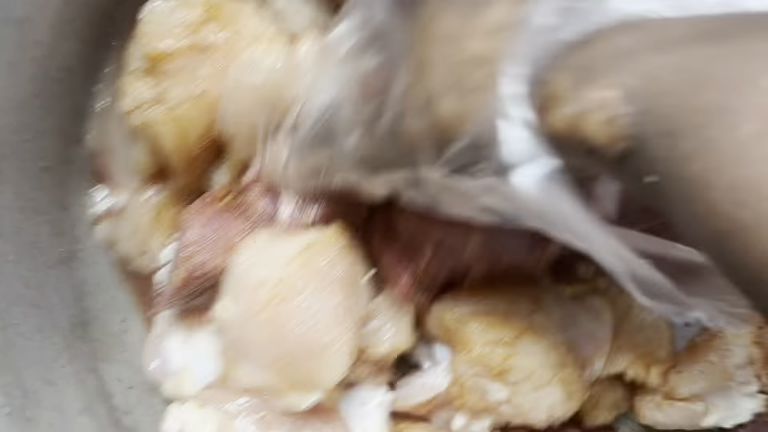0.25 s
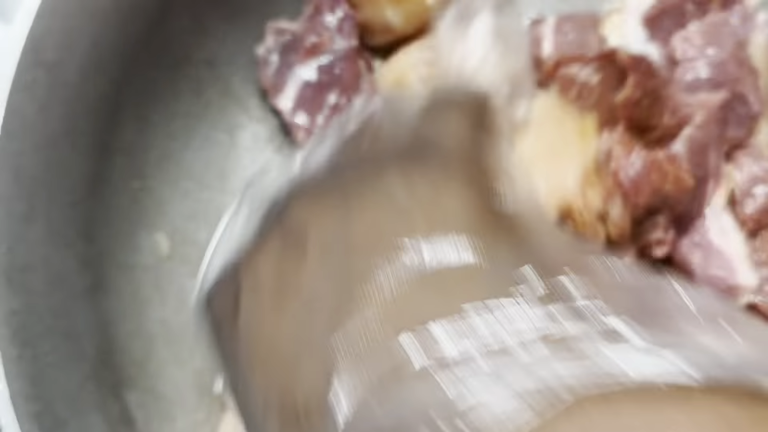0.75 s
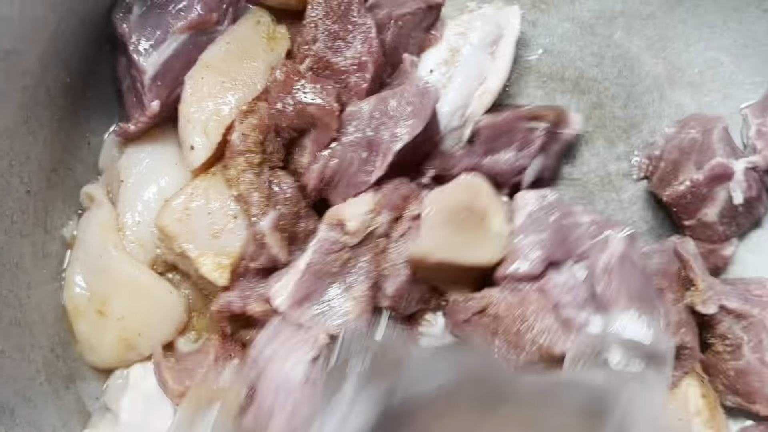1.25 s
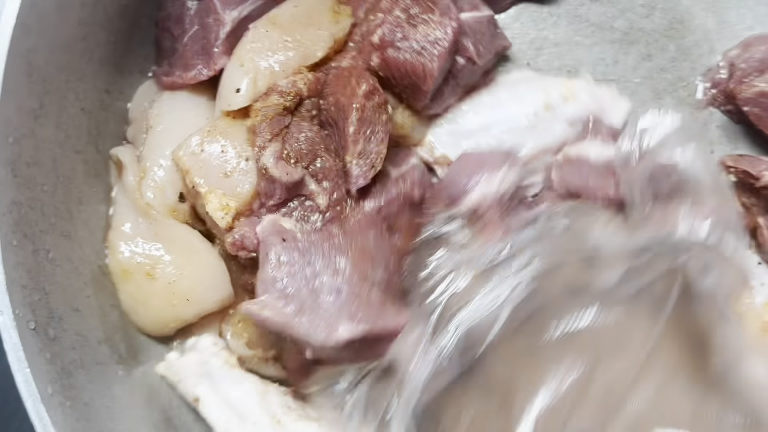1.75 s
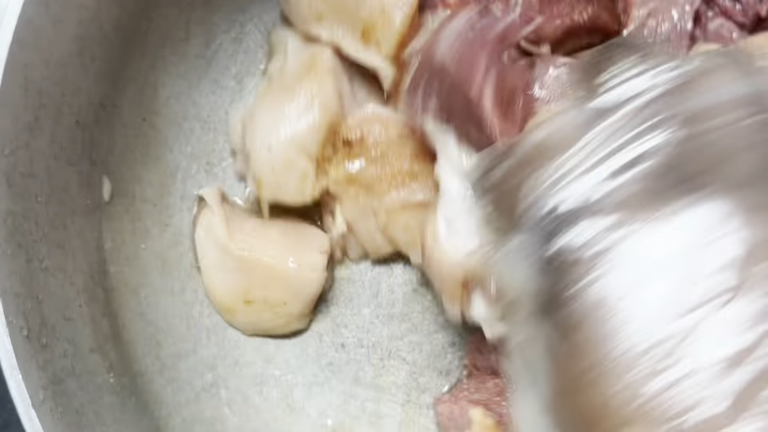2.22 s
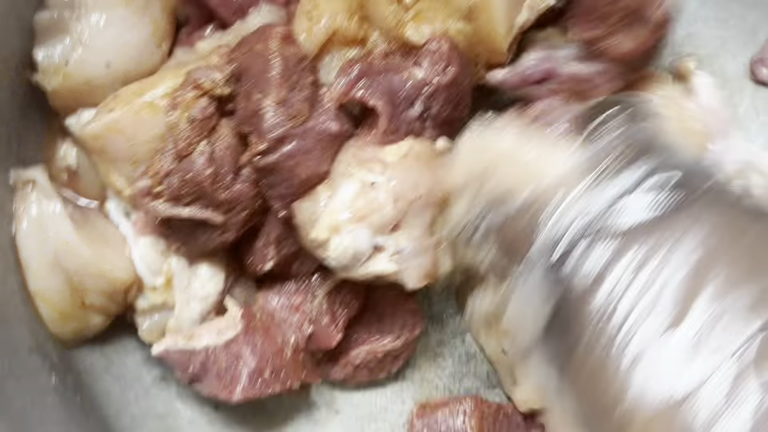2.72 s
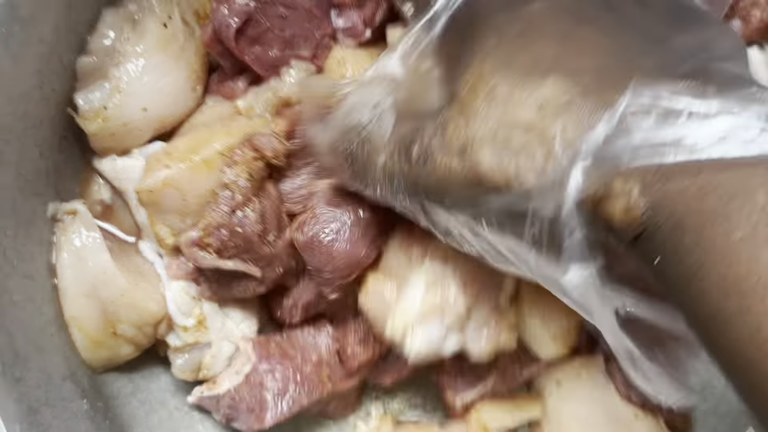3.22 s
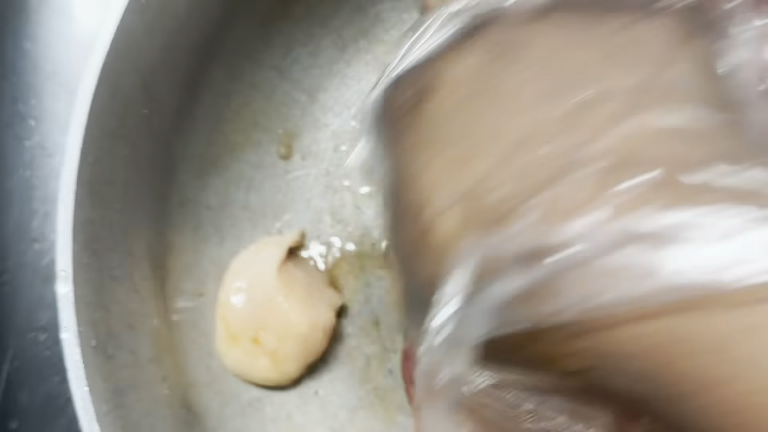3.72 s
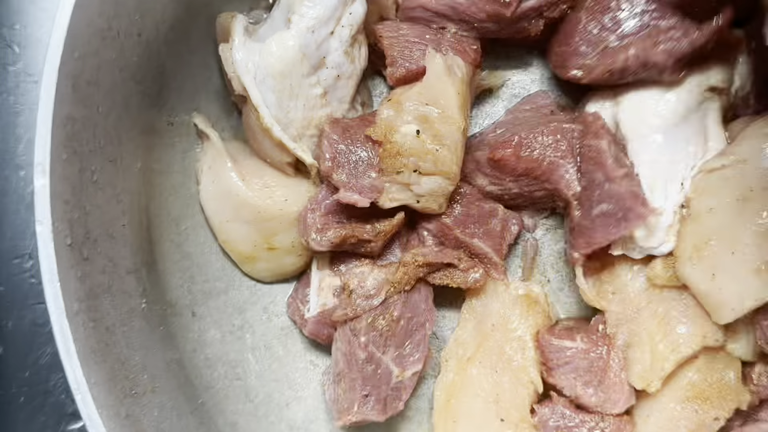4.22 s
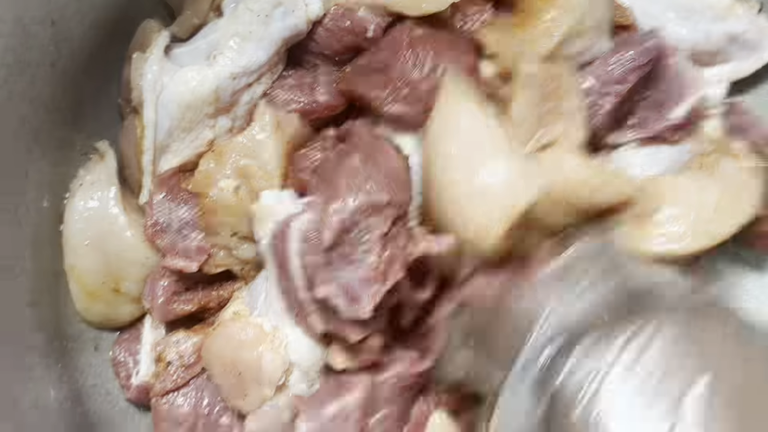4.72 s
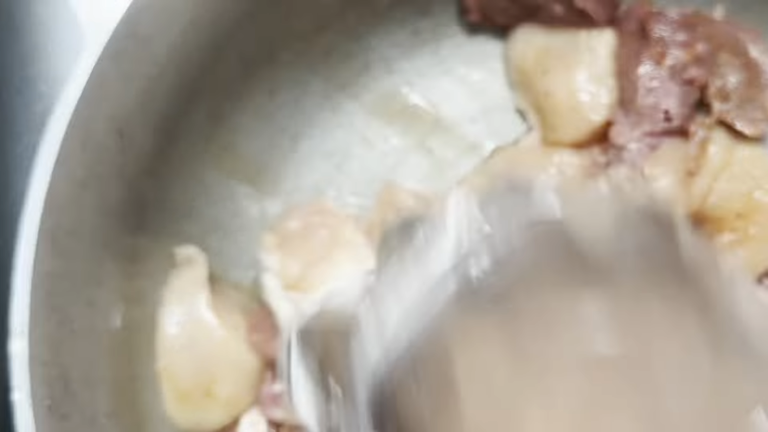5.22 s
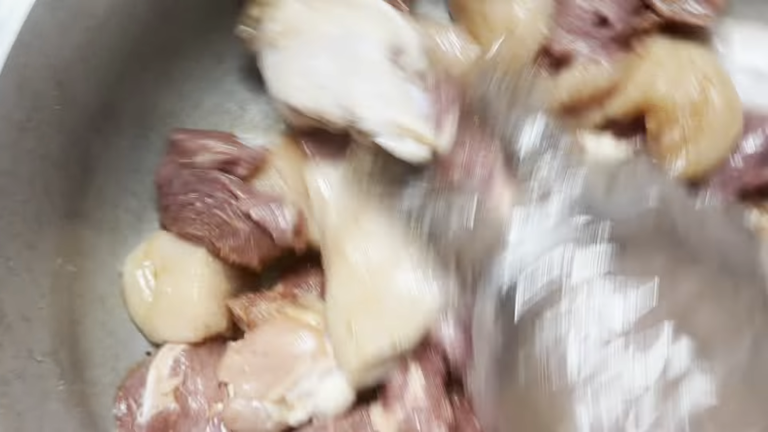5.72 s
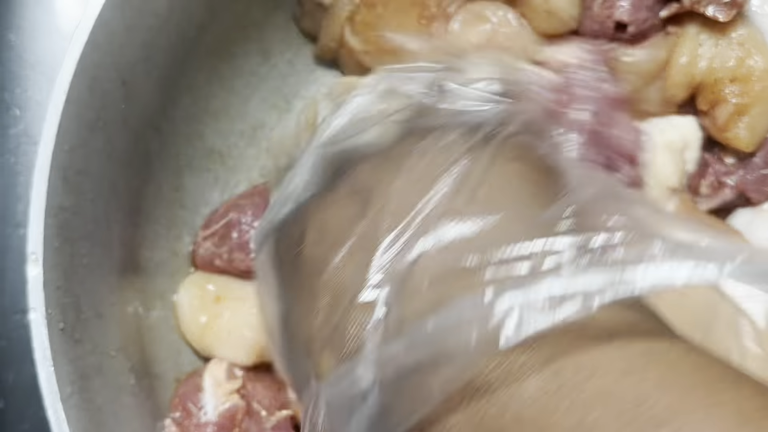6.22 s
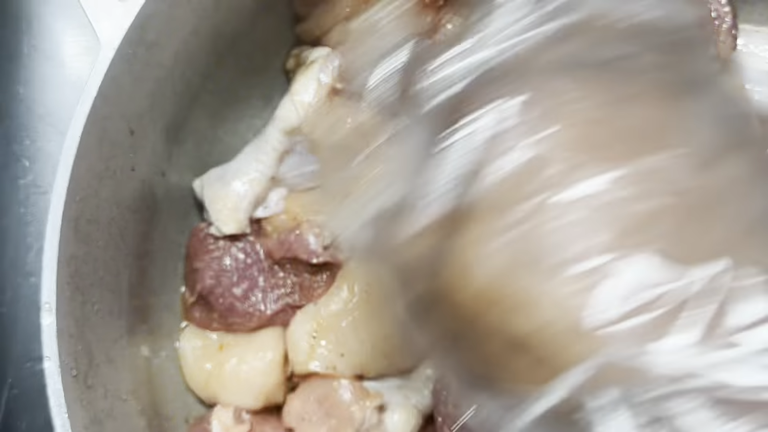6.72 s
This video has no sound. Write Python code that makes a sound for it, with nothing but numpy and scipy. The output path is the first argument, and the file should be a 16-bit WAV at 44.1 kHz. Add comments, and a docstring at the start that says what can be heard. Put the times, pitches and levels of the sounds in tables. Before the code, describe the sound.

Close, wide stereo sound of raw seasoned meat being turned by hand in an aluminium pot. A thin plastic glove crinkles in quick repeated strokes while wet pieces squelch and drag over the metal. Limp pieces land with dull, wet thuds, the harder ones making the pot ring briefly. A loud drop comes near the start, more follow irregularly, and the end grows softer over a quiet kitchen tone.

```python
"""In a kitchen, close by, a gloved hand turns raw, seasoned meat over in a wide aluminium pot.
The thin plastic glove crinkles, rustles and ticks: random clicks and noise through filters.
Wet pieces squelch (torn films, air pops) and drag over the metal (slips stirring damped pot modes).
Tossed pieces slap down: a push and a wet splat make the bottom thud; bare metal rings briefly.
Judders of the glove, squirts of juice and a quiet room tone complete it."""
import sys
import numpy as np
from scipy import signal
from scipy.fft import rfft, irfft, next_fast_len
from scipy.io import wavfile

SR = 44100
rng = np.random.default_rng(int(sys.argv[2]) if len(sys.argv) > 2 else 0)


def wav_record(signal):
    """Record a signal, one row per channel, as 16-bit PCM in the file named by sys.argv[1]."""
    frames = np.transpose(np.atleast_2d(signal))
    bounded = np.clip(frames, -1, 1)
    # unit amplitude maps onto the largest positive 16-bit level
    quanta = np.round(bounded * 32767).astype(np.int16)
    wavfile.write(sys.argv[1], SR, quanta)


N = 306495
TIME = np.arange(N) / SR

# Table levels are relative: scene() trims each layer.
# damped modes of the pot: freq_hz, level_db, t60_share (of the ring time)
BOTTOM_MODES = [(130, 2, 0.85), (154, 10.5, 1), (229, -33, 0.42), (280, -7.5, 1), (384, 0, 1)]
WALL_MODES = [(477, -1, 0.44), (543, 2.5, 0.33), (609, 1, 0.87), (650.5, 1.5, 0.76), (855, -15.5, 1)]
RIM_MODES = [(908, -0.5, 0.94), (1122, 2.5, 0.74), (1332, 2.5, 0.66), (1640, -32, 0.25), (1982, 2.5, 0.78),
             (2190, 2, 0.49), (2393, -3.5, .8)]


def from_db(db):
    """Decibels to gain."""
    return 10 ** (np.asarray(db) / 20)


def rms_one(x):
    """Scale to rms 1."""
    return x / np.sqrt(np.mean(x ** 2) + 1e-20)


def add(out, start_s, x):
    """Mix a sound in at a time."""
    start = int(start_s * SR)
    out[start:start + len(x)] += x


def in_time(rows):
    """Each column of a curve, at every sample."""
    time_s, *columns = np.transpose(rows)
    return [np.interp(TIME, time_s, column) for column in columns]


def at_hz(points, hz):
    """Read a table on a log-frequency axis."""
    points = np.array(points)
    return np.interp(np.log(hz + 1), np.log(points[:, 0]), points[:, 1])


def colour(x, spectrum):
    """Causal (minimum-phase) filter with the given spectrum, by folding its cepstrum."""
    size = 2048
    gain = from_db(at_hz(spectrum, np.fft.rfftfreq(size, 1 / SR)))
    cepstrum = irfft(np.log(gain))
    cepstrum[1:size // 2] *= 2
    cepstrum[size // 2 + 1:] = 0
    impulse = irfft(np.exp(rfft(cepstrum)))
    return signal.fftconvolve(x, impulse)[:len(x)]


def drift(rate_hz):
    """Smooth chance with spread 1: noise through two equal low-pass poles at rate_hz."""
    step, settle = 40, 2000   # samples per slow point; slow points dropped at the start
    r = np.exp(-2 * np.pi * rate_hz * step / SR)
    noise = rng.standard_normal(N // step + settle + 2)
    slow = signal.lfilter([1], [1, -2 * r, r * r], noise)[settle:]
    return np.interp(np.arange(N) / step, np.arange(len(slow)), rms_one(slow))


def grains(per_s, spread_db):
    """Random tiny clicks of uneven size and sign."""
    sizes = from_db(spread_db * np.minimum(rng.exponential(1, N), 4))
    signs = rng.choice([-1, 1], N)
    return sizes * signs * (rng.random(N) < per_s / SR)


def ring(force, hz, t60_s):
    """One mode: a click sets it ringing; a steady push radiates nothing."""
    r = np.exp(-np.log(1000) / (t60_s * SR))
    w = 2 * np.pi * hz / SR
    return signal.lfilter([1, 0, -1], [1, -2 * r * np.cos(w), r * r], force + 1e-18)


def body(force, modes, t60_s):
    """A set of modes driven by one force, with alternating signs."""
    return sum((-1) ** k * from_db(db) * ring(force, hz, t60_s * share)
               for k, (hz, db, share) in enumerate(modes))


def chirps(clicks, pitches_hz, cycles):
    """Deal clicks at random to short resonances, each ringing for the same number of cycles."""
    dealt = rng.integers(0, len(pitches_hz), N)
    return sum(ring(clicks * (dealt == k), hz, cycles / hz) for k, hz in enumerate(pitches_hz))


def widen(mid, side):
    """Two unrelated signals become left and right, as alike in each band as the table says."""
    # freq_hz, left-right likeness (1 same, -1 opposite)
    likeness = [(60, .97), (150, .93), (400, 0.25), (800, -0.2), (1400, 0.5), (2200, .95), (2900, .8),
                (3700, .94), (4400, 0.85), (6500, 0.15), (8500, -.05), (12000, -.45), (16000, -.1)]
    size = next_fast_len(N)
    alike = np.clip(at_hz(likeness, np.fft.rfftfreq(size, 1 / SR)), -.99, .99)
    mid = irfft(rfft(mid, size) * np.sqrt(1 + alike), size)[:N]
    side = irfft(rfft(side, size) * np.sqrt(1 - alike), size)[:N]
    return rms_one(np.array([mid + side, mid - side]))


def wide_noise(spectrum):
    """Coloured stereo noise at rms 1."""
    return widen(*[colour(rng.standard_normal(N), spectrum) for _ in range(2)])


def patchy(x, patchy_db, rate_hz):
    """Each octave swells and fades by itself, so the colour keeps shifting."""
    size = next_fast_len(N)
    octave = np.clip(np.log2(np.fft.rfftfreq(size, 1 / SR) / 110 + 1e-9), 0, 7)
    whole = rfft(x, size)
    out = 0
    for k in range(8):
        band = irfft(whole * np.maximum(1 - abs(octave - k), 0), size)[:, :N]
        out = out + band * from_db(patchy_db * drift(rate_hz))
    return rms_one(out)


def stirring():
    """Levels in dB of glove, wet meat and sliding: strokes swell and fade over the undertone."""
    # strokes of the hand: start_s, length_s, crinkle_db, squelch_db
    strokes = [(0.123, 0.27, -37, -39.5), (0.347, 0.14, -38.5, -45), (0.536, 0.16, -36, -38),
               (0.756, 0.11, -36, -35.5), (0.982, 0.13, -38, -34), (1.29, 0.12, -40, -37.5),
               (1.507, 0.085, -34.5, -35.5), (1.704, 0.1, -39, -37.5), (1.882, 0.12, -36.5, -36),
               (2.069, 0.076, -35, -34), (2.269, 0.18, -37.5, -36), (2.363, 0.035, -42.5, -38),
               (2.59, 0.18, -40, -33), (2.82, 0.044, -35, -37), (2.949, .11, -37.5, -34.5),
               (3.178, 0.13, -41.5, -35.5), (3.336, 0.16, -38.5, -34), (3.555, 0.062, -34, -33.5),
               (3.782, 0.13, -46.5, -37), (3.94, 0.16, -41, -36), (4.208, 0.032, -32.5, -35.5),
               (4.32, 0.15, -36, -34), (4.604, 0.097, -33, -38), (4.852, 0.08, -40.5, -36),
               (5.058, 0.097, -40, -35), (5.278, 0.054, -37, -35.5), (5.387, 0.1, -38, -41.5),
               (5.602, 0.21, -42, -38.5), (5.814, 0.041, -38.5, -42), (5.917, 0.09, -38, -39),
               (6.101, 0.023, -36.5, -36), (6.202, 0.028, -48, -39), (6.353, 0.11, -38, -37.5),
               (6.485, 0.22, -50, -40), (6.742, 0.068, -41.5, -39.5), (6.861, 0.11, -40, -37.5)]
    # between strokes: time_s, glove_rustle_db, sliding_db
    undertone = [(0.0, -33, -23.5), (0.25, -45, -31), (0.73, -46, -29), (0.9, -42.5, -34.5),
                 (1.2, -40, -32.5), (1.75, -43, -39), (2.5, -41, -30.5), (2.94, -45.5, -30),
                 (3.12, -41.5, -35), (3.3, -42.5, -37), (3.7, -38, -27), (4.28, -45, -40.5),
                 (4.72, -42.5, -27.5), (5.2, -40.5, -35.5), (5.7, -44, -32.5), (6.05, -43.5, -45),
                 (6.5, -45, -47), (6.72, -53, -49), (6.94, -44, -35)]
    attack_s, release_s, sag_db_per_s = 0.011, 0.03, 19   # a stroke eases as the meat yields
    seep_db = -1     # wet meat settling, relative to the rustle
    pushed_db = 2    # meat shoved over the metal, relative to the stroke's squelch
    start_s, length_s, crinkle_db, wet_db = np.transpose(strokes)[:, :, None]
    t = TIME[::20]
    age_s = np.maximum(t - start_s, 0)
    effort = (1 - np.exp(-age_s / attack_s)) * from_db(-sag_db_per_s * age_s)
    effort = effort * np.exp(-np.maximum(age_s - length_s, 0) / release_s)
    rustle_db, slide_db = in_time(undertone)

    def level(stroke_db, rest_db):
        power = np.sum((effort * from_db(stroke_db)) ** 2, axis=0)
        return 10 * np.log10(np.interp(TIME, t, power) + from_db(rest_db) ** 2)
    return (level(crinkle_db, rustle_db), level(wet_db, rustle_db + seep_db),
            level(wet_db + pushed_db, slide_db))


def glove(level_db, folds_per_s, spread_db, flutter_db, patchy_db):
    """Thousands of small folds buckle in the film; a harder stroke buckles more of them."""
    # freq_hz, level_db
    crinkle_spectrum = [(300, -6), (900, -21), (1600, -9), (3000, -2), (4500, -2.5), (7300, 5), (10500, 2),
                        (16000, -0.5)]
    per_s = folds_per_s * rms_one(from_db(level_db / 2))

    def folds():
        return colour(grains(per_s, spread_db) / np.sqrt(per_s), crinkle_spectrum)
    crinkle = patchy(widen(folds(), folds()), patchy_db, rate_hz=23.0)
    return crinkle * from_db(level_db + flutter_db * drift(rate_hz=3.7))


def tugs(rise_s, fade_s):
    """The glove pulls taut: a flurry of folds buckles at once and dies away."""
    # start_s, level_db (before rise and fade)
    pulls = np.array([(1.889, -36), (2.612, -39), (2.825, -39), (2.949, -41), (3.135, -41), (3.177, -32.5),
                      (3.8, -34.5), (3.945, -39.5), (4.197, -39.5), (5.048, -37.5), (5.271, -38),
                      (5.486, -42), (5.623, -40), (6.114, -42), (6.366, -58), (6.529, -43), (6.612, -36),
                      (6.752, -43.5)])
    # freq_hz, level_db
    rustle_spectrum = [(300, -7.5), (900, -15), (1800, 6.5), (3200, 4), (6500, 7.5), (10000, 6),
                       (16000, -7.5)]
    age_s = np.maximum(TIME - pulls[:, :1], 0)
    flurries = from_db(pulls[:, 1:]) * (1 - np.exp(-age_s / rise_s)) * np.exp(-age_s / fade_s)
    return flurries.sum(axis=0) * wide_noise(rustle_spectrum)


def ticks(level_db):
    """Sticky film peels off the meat in sharp little ticks, each with a brief pitch of its own."""
    pitches_hz = np.geomspace(1900, 9000, 10)

    def peeling():
        return chirps(grains(per_s=170, spread_db=1.3), pitches_hz, cycles=14)
    return from_db(level_db) * widen(peeling(), peeling())


def squelch(level_db, films_per_s, patchy_db, bubble_db, bubbles_per_s, cycles):
    """Wet films tear between the pieces, and trapped air pops with a short pitch."""
    # freq_hz, level_db
    squelch_spectrum = [(250, -6), (600, -3.5), (870, 4.5), (1120, -5.5), (1520, 7), (2100, -1.5),
                        (3000, -2.5), (5000, -5.5), (10000, -6)]

    def films():
        return colour(grains(films_per_s, spread_db=0.0), squelch_spectrum)
    tearing = widen(films(), films())
    pops = grains(bubbles_per_s, spread_db=2.0)
    bubbles = rms_one(chirps(pops, np.geomspace(800, 3200, 24), cycles))
    wet = tearing + from_db(bubble_db) * bubbles
    return patchy(wet, patchy_db, rate_hz=17.3) * from_db(level_db)


def drag(level_db, slips_per_s, t60_s, wall_db, rim_db):
    """Sliding meat sticks and slips, softly stirring the damped modes of the pot."""
    def rubbed():
        slips = grains(slips_per_s, spread_db=3.5)
        wall = from_db(wall_db) * body(slips, WALL_MODES, t60_s)
        rim = from_db(rim_db) * body(slips, RIM_MODES, t60_s)
        return body(slips, BOTTOM_MODES, t60_s) + wall + rim
    return patchy(widen(rubbed(), rubbed()), patchy_db=3, rate_hz=10) * from_db(level_db)


LEAD_S = .012            # wet skin touches this long before the weight of a piece arrives
LIGHT_TAP_S = 0.0027     # contact time of a push of size 1; longer contacts push less sharply


def blow(x, db):
    """Scale to a level, as rms over the first 40 ms."""
    return from_db(db) * x / np.sqrt(np.mean(x[:SR // 25] ** 2) + 1e-20)


def pressed(force, hz, t60_s):
    """A mode under soft meat: pitch sinks as the piece settles and quivers as the flesh wobbles."""
    settle_s, settle_bend = 0.0078, 0.024    # starts sharp by this share
    quiver_share, quiver_per_s = .012, 120
    t = np.arange(len(force)) / SR
    steps = t * quiver_per_s
    count = int(steps[-1]) + 2
    quiver = np.interp(steps, np.arange(count), rng.standard_normal(count))
    bend = 1 + settle_bend * np.exp(-np.maximum(t - LEAD_S, 0) / settle_s) + quiver_share * quiver
    round_attack = signal.butter(1, [hz / 2, 2 * hz], "band", fs=SR, output="sos")
    force = signal.sosfilt(round_attack, force + 1e-18)
    turn = np.exp(2j * np.pi * hz * np.cumsum(bend) / SR)
    decay = np.exp(-np.log(1000) / (t60_s * SR))
    return (turn * signal.lfilter([1], [1, -decay], force * turn.conj())).real


def struck(mode, force, modes, t60_s, db):
    """Sum of struck modes; where the piece lands sets the sign of each (drawn at random)."""
    parts = [rng.choice([-1, 1]) * blow(mode(force, hz, t60_s * share), mode_db)
             for hz, mode_db, share in modes]
    return blow(sum(parts), db)


def loaded(modes, main_hz, main_db, contact_s, focus_db):
    """The weight of the meat tunes one mode; others weaken with every octave away from it."""
    soft_focus = 0.56   # how much a longer, softer contact favours the loaded mode
    fall_db = focus_db * (contact_s / LIGHT_TAP_S) ** soft_focus
    others = [(hz, db - fall_db * abs(np.log2(hz / main_hz)), share) for hz, db, share in modes]
    return [(main_hz, main_db, 1)] + others


def knocks(thud_db, loaded_db, wall_db, loaded_wall_db, rim_db, slap_db, splat, mush, touch_db,
           focus_db):
    """Each piece lands with a push and a splat of small wet contacts; both drive the pot."""
    # landings, a limp piece often in two or three goes: contact_end_s, loaded_bottom_hz,
    # thud_db, loaded_wall_hz, wall_db, slap_db, contact_s
    landings = [(0.162, 165, -29, 580, -42, -42, 0.0087), (0.292, 205, -8.5, 548, -21, -22, 0.0032),
                (0.329, 238, -17, 604, -30, -33.5, 0.0044), (0.346, 150, -15.5, 390, -32, -51, 0.0052),
                (0.377, 148, -23.5, 620, -37, -38, 0.0047), (0.474, 159, -41, 626, -35, -60, 0.0082),
                (0.53, 168, -24, 682, -29, -32, 0.0022), (0.645, 141, -35, 572, -43, -52, 0.01),
                (0.698, 159, -30, 696, -40, -32, 0.0042), (0.712, 157, -26, 460, -36, -36, 0.004),
                (0.756, 157, -31, 650, -31.5, -38, 0.0039), (0.855, 164, -26, 640, -36, -55, 0.0046),
                (1.058, 120, -23.5, 604, -25, -29, 0.0078), (1.096, 140, -31, 594, -31.5, -47, 0.0072),
                (1.271, 135, -31, 547, -40, -34.5, 0.0064), (1.397, 197, -19, 630, -20, -37, 0.0025),
                (1.405, 215, -11.5, 649, -19.5, -20, 0.0027), (1.427, 145, -19.5, 696, -30, -39, 0.0063),
                (1.521, 127, -14, 594, -24, -27, 0.0044), (1.537, 133, -18, 599, -24, -45, 0.0047),
                (1.893, 155, -29, 636, -40, -60, 0.0033), (2.035, 266, -17.5, 496, -30, -31.5, 0.0044),
                (2.074, 163, -34, 620, -34, -33, 0.01), (2.204, 170, -26.5, 517, -37, -61, 0.0061),
                (2.4, 114, -28.5, 509, -25.5, -32.5, 0.0068), (2.49, 148, -37, 620, -34.5, -52, 0.0091),
                (2.624, 123, -16, 603, -21, -52, 0.0078), (2.637, 132, -25, 600, -35, -35, 0.0062),
                (2.688, 162, -17, 550, -22, -34, 0.0027), (2.703, 140, -20, 590, -22.5, -44, 0.0038),
                (2.729, 152, -31, 565, -31, -52, 0.0037), (2.832, 148, -23.5, 606, -30.5, -32, 0.0075),
                (2.862, 149, -24, 626, -17.5, -35, .008), (2.875, 170, -13.5, 621, -14.5, -21.5, 0.004),
                (2.908, 156, -18.5, 593, -28, -33, 0.0061), (3.027, 168, -20, 625, -14, -37, 0.0021),
                (3.033, 161.5, -18, 620, -20.5, -24, 0.0033), (3.051, 151, -36, 643, -27.5, -32.5, 0.003),
                (3.187, 134, -28, 636, -46, -56, 0.0051), (3.381, 146, -28, 628, -43, -29.5, 0.012),
                (3.444, 153, -21, 618, -24, -35, 0.0061), (3.579, 140, -25.5, 670, -41, -39.5, 0.0094),
                (3.702, 270, -10, 483, -19.5, -20.5, 0.0026), (3.712, 160.6, -12, 615, -23, -45, 0.0035),
                (3.726, 292, -16, 467, -38, -44, 0.005), (3.808, 142, -20.5, 626, -32, -30.5, 0.0078),
                (4.108, 266, -11.5, 485, -18.5, -23, 0.004), (4.142, 284, -36, 484, -55, -43, 0.0063),
                (4.33, 169, -27, 370, -40, -53, 0.0054), (4.407, 112, -27.5, 626, -49, -30, 0.0092),
                (4.505, 149.8, -37, 699, -35.5, -44, 0.0089), (4.637, 127, -22, 596, -25.5, -33, 0.0083),
                (4.74, 321.5, -9, 590, -19.5, -21.5, 0.0044), (4.756, 303, -20, 580, -33, -30, 0.0063),
                (4.783, 349.5, -19.5, 620, -36, -30.5, 0.0059), (4.816, 136, -25, 396, -54, -43, 0.0074),
                (4.96, 151, -40, 644, -37, -49, 0.01), (5.08, 144, -27, 593, -32.5, -51, 0.011),
                (5.185, 148, -49, 629, -38, -54, 0.0077), (5.45, 142, -43, 627, -48, -48, 0.0091),
                (5.514, 143, -29.5, 503, -44, -41, 0.0061), (5.649, 127, -28.5, 550, -39, -47, 0.0058),
                (5.72, 166, -28, 558, -30.5, -34, .007), (5.734, 104, -30, 535, -39, -58, 0.0047),
                (5.76, 130, -54, 600, -37, -47, 0.0061), (6.131, 178, -24, 438, -63, -34, 0.0092),
                (6.145, 146, -20, 435, -66, -59, 0.008), (6.515, 158, -37.5, 600, -58, -52, 0.0062)]
    # shortest while the meat is spread over the bottom: time_s, t60_s
    ring_time = [(0.3, 0.089), (1.42, 0.13), (1.55, 0.074), (2.2, 0.14), (2.7, 0.066), (3.05, 0.081),
                 (3.8, 0.071), (4.7, 0.13), (5.1, 0.11), (6.2, 0.091)]
    # freq_hz, level_db
    slap_spectrum = [(40, -56), (130, -9), (500, -13), (1000, 1.5), (2000, 4.5), (3200, -2.5), (7000, -2.5),
                     (9500, -14), (15000, -51)]
    flesh_hz, rim_t60_s = 840, .07
    spatter_db, spatter_s = -24, 0.032   # juice spatters on after a slap
    push_at = 0.615                      # the weight arrives this far through the contact
    t = np.arange(int(.2 * SR)) / SR
    age_s = np.maximum(t - LEAD_S, 0)
    flesh = signal.butter(2, flesh_hz, fs=SR, output="sos")
    touch = from_db(touch_db) * np.minimum(t / LEAD_S, 1) ** 2
    out = np.zeros(N + SR)
    for end_s, bottom_hz, thud, wall_hz, wall, slap, contact_s in landings:
        t60_s = np.interp(end_s, *np.transpose(ring_time))
        swell = touch + 1 - np.exp(-(age_s / contact_s) ** 2)
        wet = rng.standard_normal(len(t)) * swell
        contacts = wet * np.exp(-age_s / (splat * contact_s))
        spatter = wet * from_db(spatter_db) * np.exp(-age_s / spatter_s)
        force = mush * contacts / np.linalg.norm(contacts)
        force[int((LEAD_S + push_at * contact_s) * SR)] += LIGHT_TAP_S / contact_s
        soft = signal.sosfilt(flesh, force + 1e-18)  # flesh cushions the blow
        bottom_modes = loaded(BOTTOM_MODES, bottom_hz, loaded_db, contact_s, focus_db)
        wall_modes = loaded(WALL_MODES, wall_hz, loaded_wall_db, contact_s, focus_db)
        start_s = end_s - contact_s - LEAD_S
        add(out, start_s, struck(pressed, soft, bottom_modes, t60_s, thud + thud_db))
        add(out, start_s, struck(pressed, soft, wall_modes, 1.16 * t60_s, wall + wall_db))
        add(out, start_s, struck(ring, force, RIM_MODES, rim_t60_s, slap + rim_db))
        add(out, start_s, blow(colour(contacts + spatter, slap_spectrum), slap + slap_db))
    return out[:N]


def clangs():
    """A firm piece hits the bare wall: undamped metal sings in thin tones, chosen by the spot."""
    # start_s, t60_share, then one level_db per spot_hz
    hits = [(0.295, 0.52, -34, -17.5, -22.5, -38, -28), (0.528, 1.7, -45, -52, -36, -52, -47),
            (1.406, .9, -20.5, -27, -27, -23, -30), (2.873, .5, -45, -19.5, -35, -40, -41),
            (3.701, 0.56, -48, -40, -32.5, -46, -23), (4.108, 0.42, -42, -39, -36, -33, -24),
            (4.74, 0.67, -29, -17, -31, -47, -32)]
    # freq_hz at which each hit's levels are given
    spot_hz = [650, 780, 1364, 1626, 1970]
    # freely ringing tones: freq_hz, level_db, t60_s (before t60_share)
    free_modes = [(279, -5, 0.64), (640, -15, 0.99), (800, -5.5, 0.19), (930, 2, 0.11), (1115, -4.5, 0.17),
                  (1365, -1.5, 0.44), (1640, -3, 0.33), (1965, 3, 0.14), (2300, -18, 0.082)]
    out, tap = np.zeros(N + SR), signal.unit_impulse(SR) / 2
    for start_s, share, *spot_db in hits:
        spot = list(zip(spot_hz, spot_db))
        modes = [(hz, db + at_hz(spot, hz), t60_s) for hz, db, t60_s in free_modes]
        add(out, start_s, body(tap, modes, share))
    waver_db = 1.7 * drift(rate_hz=35)   # shifting meat makes the ring uneven
    return out[:N] * from_db(waver_db)


def judders():
    """The film sticks and slips on bare metal at a nearly even rate: a short, rough low note."""
    # start_s, length_s, slips_per_s, level_db (before the swell)
    runs = [(0.691, 0.042, 250, -31), (0.714, 0.054, 156, -30.5), (0.835, 0.097, 157, -38)]
    # freq_hz, level_db
    judder_spectrum = [(100, -12), (160, 14), (235, -17), (310, 10), (475, 8), (630, -3), (720, 15),
                       (850, -24), (1170, -2), (1500, -26), (2100, -24), (5000, -50)]
    wobble, uneven_db = .008, 1.5   # spread of the pace (share) and of slip strength
    out = np.zeros(N)
    pace_s = np.cumsum(1 + wobble * drift(rate_hz=27)) / SR
    for start_s, length_s, slips_per_s, db in runs:
        turns = np.floor(slips_per_s * pace_s[int(start_s * SR):int((start_s + length_s) * SR)])
        strength = from_db(uneven_db * rng.standard_normal(len(turns)))
        slips = np.diff(turns, prepend=turns[0]) * strength
        through = np.linspace(0, 1, len(turns))
        swell = 2 * np.sqrt(through * (1 - through))
        note = rms_one(colour(slips - slips.mean(), judder_spectrum))
        add(out, start_s, from_db(db) * note * swell)
    return out


def squishes(pops_per_s, fade_s, spread_octaves, cycles):
    """Juice squirts from a pocket between two pieces: a quick run of tiny pops around its pitch."""
    # start_s, pocket_hz, level_db
    pockets = [(0.235, 1440, -36), (0.418, 1560, -33.5), (1.044, 1620, -36), (1.735, 1460, -37),
               (4.385, 1620, -38), (4.869, 1090, -44), (5.101, 1410, -41), (5.285, 1720, -38.5),
               (5.449, 1510, -39.5), (5.715, 1160, -39.5), (6.617, 2300, -45)]
    t = np.arange(int(.1 * SR)) / SR
    out = np.zeros(N + SR)
    for start_s, hz, db in pockets:
        pitches_hz = hz * 2 ** (spread_octaves * np.linspace(-1, 1, 7))
        shape = (len(pitches_hz), len(t))
        chosen = rng.random(shape) < pops_per_s / len(pitches_hz) / SR
        pops = chosen * rng.standard_normal(shape) * np.exp(-t / fade_s)
        run = sum(ring(pop, pitch, cycles / pitch) for pop, pitch in zip(pops, pitches_hz))
        add(out, start_s, from_db(db) * rms_one(run))
    return out[:N]


def placed(x):
    """The wide pot radiates from many points, so its sound reaches left and right out of step."""
    # freq_hz, out_of_step_db
    pot_width = [(60, -42), (130, -61), (195, -31), (250, -23), (330, -16), (600, -9.5), (1200, -6),
                 (2200, -47), (6000, -7)]
    # freq_hz, left_minus_right_db
    pot_pan = [(150, 0), (350, 1.2), (650, 1.3), (1200, 0)]
    size, sides = next_fast_len(N), np.array([[1], [-1]])
    hz = np.fft.rfftfreq(size, 1 / SR)
    out_of_step = 1 - 1j * sides * from_db(at_hz(pot_width, hz))
    pan = from_db(sides * at_hz(pot_pan, hz) / 2)
    return irfft(rfft(x, size) * out_of_step * pan, size)[:, :N]


def room_tone(level_db):
    """The quiet kitchen: steady, low-heavy noise."""
    # freq_hz, level_db
    room_spectrum = [(25, -24), (60, 12), (150, -3), (230, 11), (340, 27.5), (600, -5), (2000, -25),
                     (10000, -30)]
    return from_db(level_db) * wide_noise(room_spectrum)


def scene():
    """Glove, wet meat and pot over a quiet kitchen."""
    glove_db, wet_db, drag_db = stirring()
    hand = from_db(4.5) * glove(glove_db, folds_per_s=12000, spread_db=-1.0, flutter_db=0.62,
                                patchy_db=1.8)
    hand = hand + from_db(6.5) * tugs(rise_s=0.0019, fade_s=0.028) + from_db(-11) * ticks(glove_db)
    meat = from_db(-0.5) * squelch(wet_db, films_per_s=2000, patchy_db=3.5, bubble_db=-14,
                                   bubbles_per_s=200, cycles=38)
    sliding = from_db(-13.0) * drag(drag_db, slips_per_s=530, t60_s=0.085, wall_db=9.5, rim_db=2.5)
    # splat: decay in contact times; mush: size of the splat beside a light tap's push
    blows = knocks(thud_db=-9.5, loaded_db=11.0, wall_db=-8.0, loaded_wall_db=5, rim_db=-14.5,
                   slap_db=-6.5, splat=1.97, mush=0.69, touch_db=-4, focus_db=4.5)
    juice = from_db(-10) * squishes(pops_per_s=970, fade_s=0.021, spread_octaves=0.27, cycles=8.6)
    pot = placed(blows + clangs() + judders() + juice)
    return hand + meat + sliding + pot + room_tone(level_db=-55)


def record(dry):
    """The top is cut steeply, above 15.85 kHz."""
    steep = signal.ellip(12, .1, 80, 15850, fs=SR, output="sos")   # ripple dB, stop dB, cutoff Hz
    return signal.sosfilt(steep, dry)


dry = scene()
out = record(dry)
wav_record(out)
```